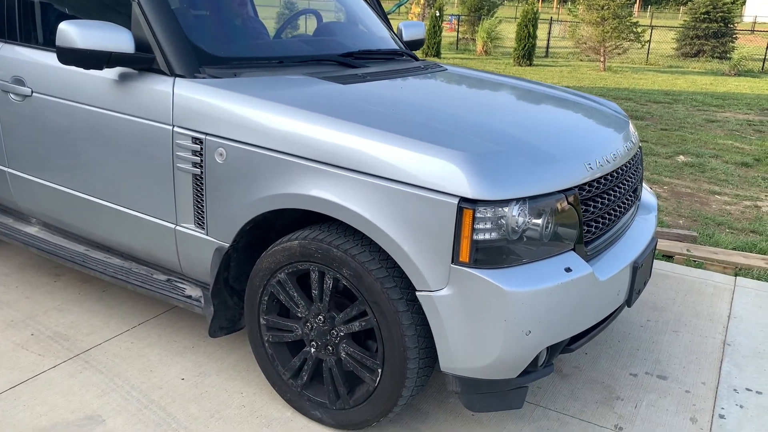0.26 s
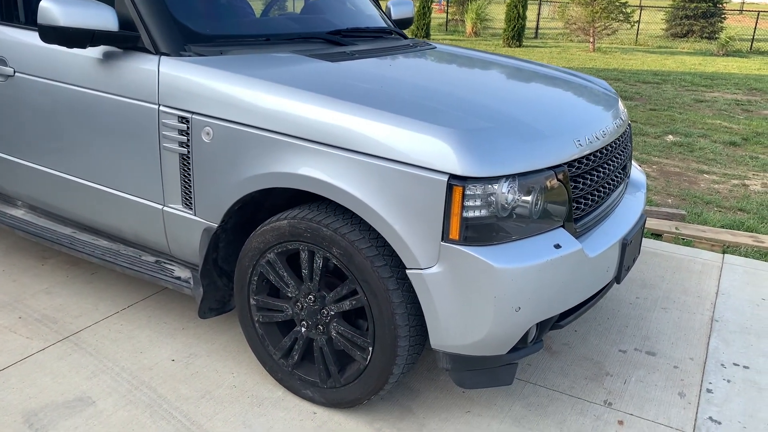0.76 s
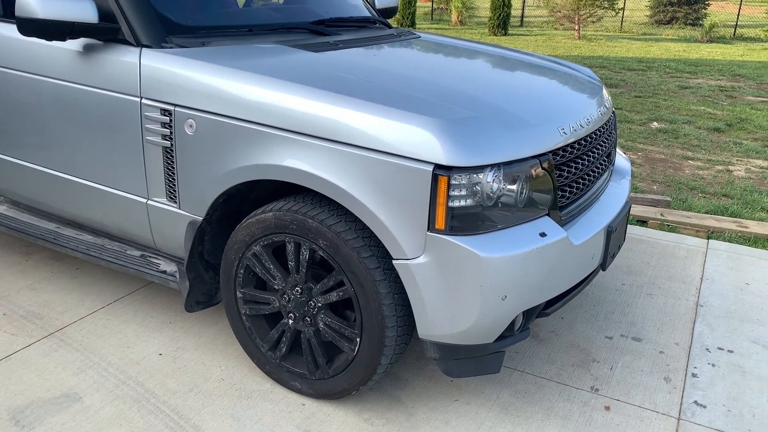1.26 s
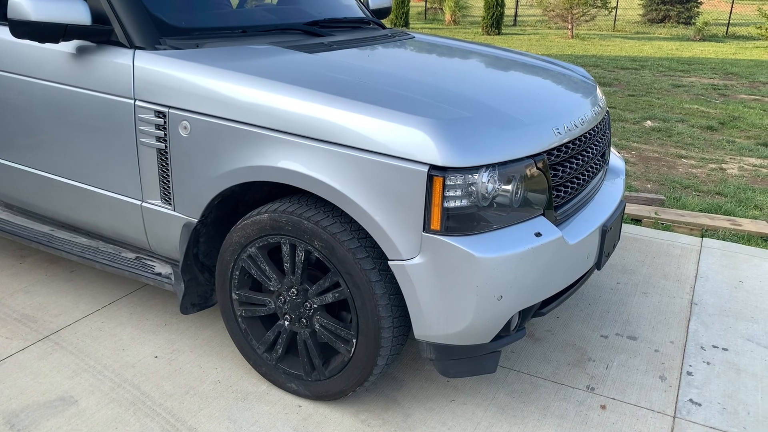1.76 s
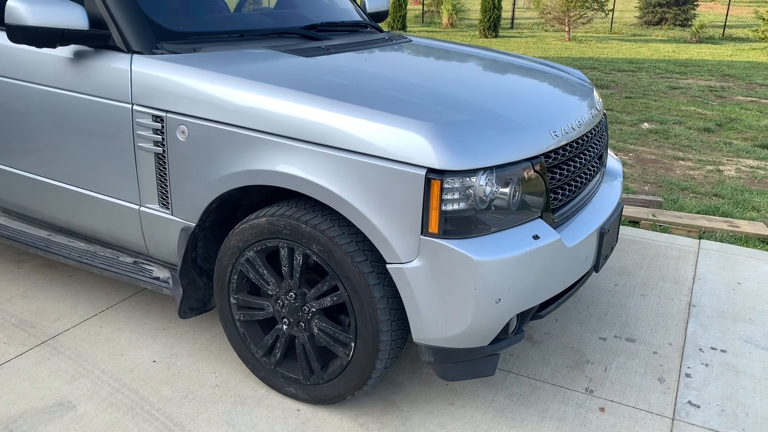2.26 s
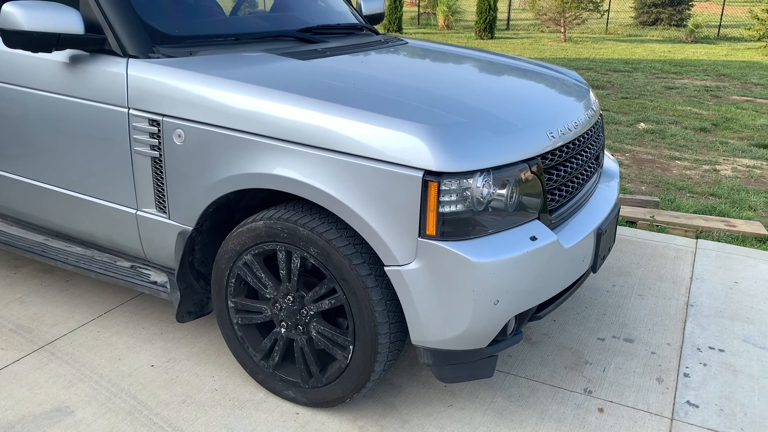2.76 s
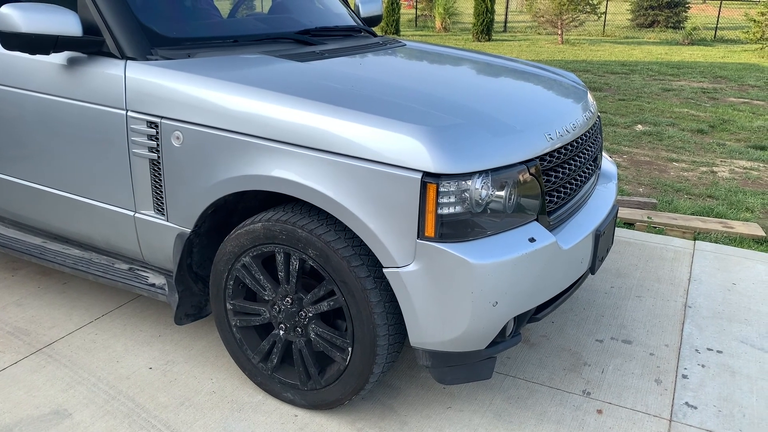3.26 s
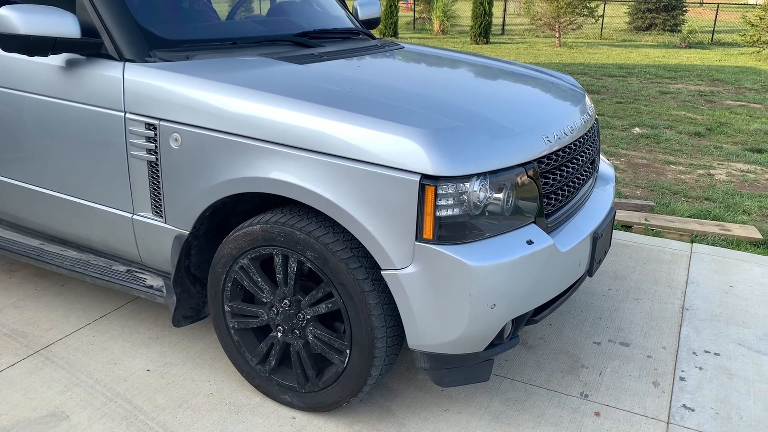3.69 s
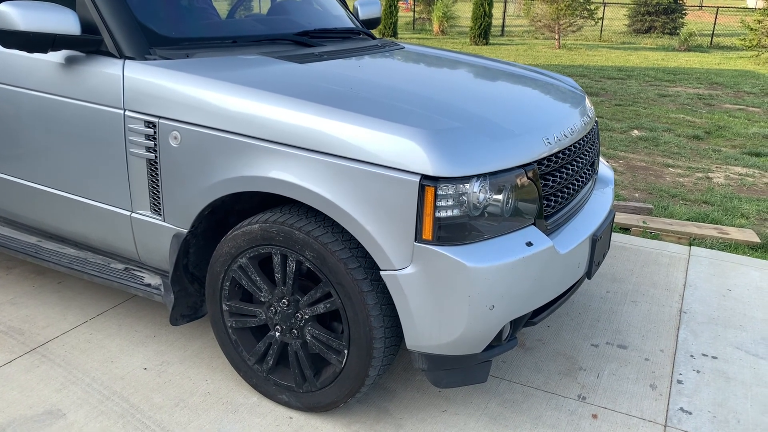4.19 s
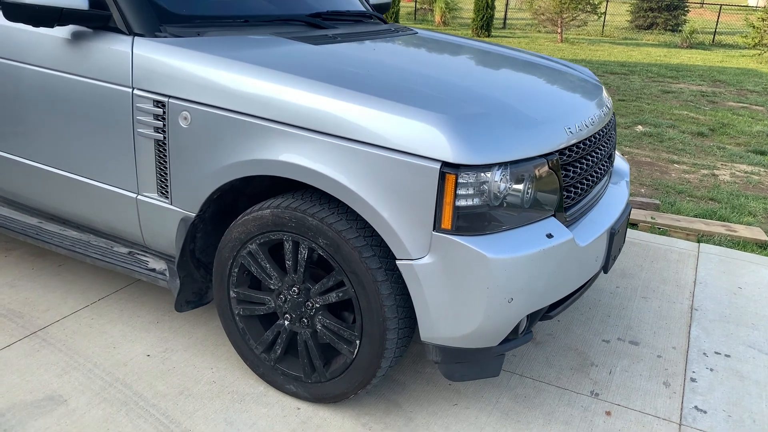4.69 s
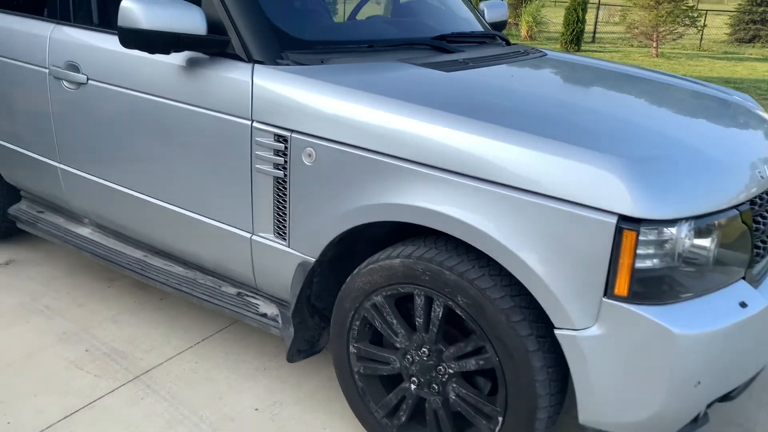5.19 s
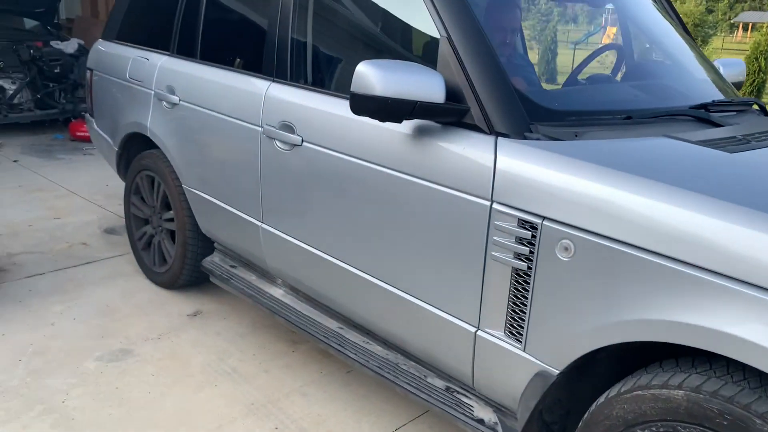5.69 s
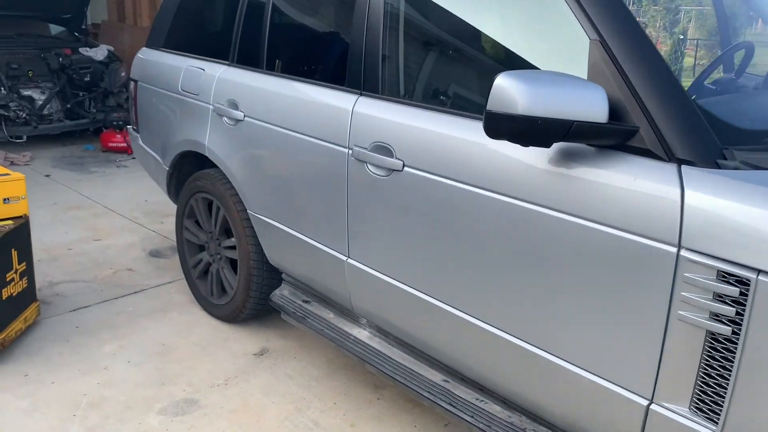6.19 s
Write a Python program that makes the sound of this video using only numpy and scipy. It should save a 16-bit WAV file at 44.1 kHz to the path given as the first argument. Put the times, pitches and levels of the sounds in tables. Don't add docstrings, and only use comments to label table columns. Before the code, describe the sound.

Wind slaps rumble over a big car engine's hissing, tapping idle on a driveway, its tone shifting as the microphone turns near the end.

```python
import sys
import numpy as np
from scipy import signal
from scipy.fft import rfft, irfft, next_fast_len
from scipy.io import wavfile
from scipy.ndimage import uniform_filter1d

SR = 44100
rng = np.random.default_rng(int(sys.argv[2]) if len(sys.argv) > 2 else 0)


def dump(signal):
    limited = np.clip(np.atleast_2d(signal).T, -1, 1)
    pcm = np.round(limited * 32767).astype(np.int16)
    wavfile.write(sys.argv[1], SR, pcm)


def natural_amplitude(level_db):
    exponent = np.asarray(level_db, float) / 20
    return 10 ** exponent


N = 284004
PAD = next_fast_len(N)


def rms_one(x):
    return x / np.sqrt(np.mean(x ** 2) + 1e-20)


def in_time(rows):
    s, *columns = np.transpose(rows)
    return [np.interp(np.arange(N) / SR, s, c) for c in columns]


def at_hz(points, hz):
    table_hz, value = np.array(points).T[:2]
    return np.interp(np.log(hz), np.log(table_hz), value)


def drift(rate_hz):
    r = np.exp(-2 * np.pi * rate_hz * 40 / SR)
    noise = rng.standard_normal(N // 40 + 2002)
    slow = signal.lfilter([1], [1, -2 * r, r * r], noise)[2000:]
    return np.interp(np.arange(N) / 40, np.arange(len(slow)), rms_one(slow))


def afterglow(x, decay_s):
    return signal.lfilter([1], [1, -np.exp(-1 / (decay_s * SR))], x)


def resonate(x, modes):
    out = 0
    for k, (hz, width_hz, level_db) in enumerate(modes):
        r = np.exp(-np.pi * width_hz / SR)
        b = (1 - r * r) / 2 * np.array([1, 0, -1])
        a = [1, -2 * r * np.cos(2 * np.pi * hz / SR), r * r]
        out = out + (-1) ** k * natural_amplitude(level_db) * signal.lfilter(b, a, x)
    return out


def hiss(spectrum, patchy_db):
    hz = np.fft.rfftfreq(PAD, 1 / SR) + 1
    noise = rfft(rng.standard_normal((2, PAD))) * natural_amplitude(at_hz(spectrum, hz))
    low_hz, high_hz = spectrum[0][0], min(spectrum[-1][0], SR / 2)
    out, together = 0, drift(9.3)
    for centre in np.arange(np.log2(low_hz), np.log2(high_hz), .5):
        window = np.cos(np.pi / 2 * np.clip(2 * (np.log2(hz) - centre), -1, 1)) ** 2
        patch = irfft(noise * window, PAD)[:, :N]
        out = out + patch * natural_amplitude(patchy_db * (0.34 * together + drift(31)))
    return rms_one(out)


# (start [s], length [s], level [dB], eddy pitch [octaves above lowest band])
GUSTS = [(0.292, 0.1, -25.5, 0.44), (0.554, 0.046, -27, 0.43), (0.828, 0.094, -19.5, 0.83),
         (0.943, .07, -20, .2), (1.135, 0.053, -14.5, .1), (1.159, .10, -21.5, 2.44), (1.2, 0.086, -22, .1),
         (1.418, 0.18, -26, 0.92), (1.659, 0.015, -17, 1), (2.007, .04, -18, .1),
         (2.079, 0.037, -12.5, 1.06), (2.133, .11, -22.5, 1.94), (2.338, .06, -17, 1.74),
         (2.37, .09, -20, 2.1), (2.383, 0.053, -13, 0.11), (2.55, 0.065, -22.5, 1),
         (2.677, 0.023, -16, 1.8), (2.717, 0.057, -20, 1.98), (2.814, 0.019, -23, 0.12),
         (3.08, .06, -31, 2.1), (3.346, 0.057, -27, 0.14), (4.24, 0.041, -29, .3),
         (4.79, 0.083, -24.5, 1.34), (4.884, 0.11, -27, 0.5), (5.217, 0.052, -29, 0.46),
         (5.426, .05, -27, .1), (.05, 0.12, -27, .1), (5.731, .09, -20, 2.3), (5.908, 0.16, -26.5, 1.73),
         (6.33, .07, -24, 0.082)]
GUST_RISE_S, GUST_FALL_S = 0.012, 0.016
BELOW_DB_PER_OCTAVE, ABOVE_DB_PER_OCTAVE, TOP_DB_PER_OCTAVE_SQUARED = 8, 11.5, 5.0


def gust_power(octaves):
    t, power = np.arange(N) / SR, np.zeros(N)
    for s, length_s, level_db, pitch in GUSTS:
        start_s, hold_end_s = s - GUST_RISE_S, s + length_s
        end_s = hold_end_s + GUST_FALL_S
        span = slice(max(int(start_s * SR), 0), int(end_s * SR))
        shape = np.interp(t[span], [start_s, s, hold_end_s, end_s], [0, 1, 1, 0])
        loss_db = max(BELOW_DB_PER_OCTAVE * (pitch - octaves), ABOVE_DB_PER_OCTAVE * (octaves - pitch))
        loss_db += TOP_DB_PER_OCTAVE_SQUARED * max(octaves - pitch, 0) ** 2
        power[span] += (natural_amplitude(level_db - loss_db) * shape ** 2) ** 2
    return power


# (time [s], level [dB])
BREEZE = [(0, -34.5), (.7, -38.5), (1.4, -37), (1.8, -33), (2.9, -34), (3.6, -37), (4.6, -34), (5.1, -35),
          (5.4, -31), (6.44, -33)]
# (sub-band edges [Hz], ..)
WIND_BANDS_HZ = [
    (42, 58, 76, 100),
    (100, 135, 175, 230),
    (230, 290, 360, 450),
    (470, 580, 740),
]
BREEZE_COLOUR_DB = [1.5, -2, -5.5, -13]
BREEZE_LULL_DB, BREEZE_LULLS_PER_S, BREEZE_CREST = 3.5, 8.4, 0.95


def wind():
    out, lumps, breeze_db = 0, drift(37.0), in_time(BREEZE)[0]
    for colour_db, edges_hz in zip(BREEZE_COLOUR_DB, WIND_BANDS_HZ):
        lull_db = BREEZE_LULL_DB * np.minimum(drift(BREEZE_LULLS_PER_S), BREEZE_CREST)
        breeze = natural_amplitude(breeze_db + colour_db + lull_db)
        layer = blown = 0
        for low_hz, high_hz in zip(edges_hz, edges_hz[1:]):
            sos = signal.butter(3, [low_hz, high_hz], "band", fs=SR, output="sos")
            noise = signal.hilbert(rng.standard_normal(PAD))[:N]
            eddy = signal.sosfilt(sos, noise) / np.sqrt(high_hz)
            eddy = eddy * np.exp(.5j * 1.35 * drift(4.07) * [[1], [-1]])
            layer = layer + eddy
            octaves = np.log2(low_hz / WIND_BANDS_HZ[0][1]) + 0.16
            blown = blown + np.real(eddy) * np.sqrt(breeze ** 2 + gust_power(octaves))
        even = np.sqrt(uniform_filter1d(np.mean(abs(layer) ** 2, axis=0), size=1800))
        out = out + natural_amplitude(2.5 + 1.8 * lumps) * blown / even
    return out


# (time [s], peak level [dB], pitch [Hz])
SLAPS = [(.885, -16, 92), (1.168, -12, 320), (1.662, -24, 124), (2.089, -16, 65.4), (2.1, -19, 109),
         (2.356, -12, 126), (2.399, -11, 62.5), (2.409, -20, 133), (2.681, -13.5, 178), (2.683, -12.5, 560),
         (4.829, -13.5, 138), (4.878, -18.5, 68.4), (4.918, -14.5, 129), (4.973, -19, 211),
         (5.515, -17, 75), (5.248, -16, 105), (5.743, -16, 85), (5.794, -13, 179), (6.061, -14, 220),
         (6.062, -20.5, 420)]
SLAP_LEAD_CYCLES = 0.067


def slaps():
    out, t = np.zeros((2, N)), np.arange(3500) / SR
    for (s, level_db, hz), luck in zip(SLAPS, rng.uniform(-1, 1, (len(SLAPS), 1))):
        shape = t * hz / 0.64 * np.exp(1 - t * hz / .8)
        lead = SLAP_LEAD_CYCLES * (luck + np.sign(luck)) * [[.5], [-.5]]
        wave = np.sin(2 * np.pi * (hz * t * (1 - 2.9 * t) + lead))
        at = round(s * SR)
        out[:, at:at + len(t)] += natural_amplitude(level_db) * shape * wave
    return out


# (frequency [Hz], density [dB per Hz])
RUMBLE = [(18, -31), (30, 3), (64, -3.5), (108, 0), (269, -17), (367, -9), (493, -23.5), (610, -25.5),
          (792, -10.5), (903, -14.5), (1010, -10.5), (1500, -18), (1950, -52), (3300, -120)]


def rumble():
    return natural_amplitude(-33) * hiss(RUMBLE, patchy_db=1.0)


# (frequency [Hz], density [dB per Hz])
AIR = [(3000, -13.5), (4500, -3), (6500, -6), (8300, -2), (9500, -8), (11300, -6), (13400, -4.5),
       (15700, 3)]
AIR_IDLE_DB, AIR_DB_PER_OCTAVE = -40, 6.5
PUFF_S, PUFF_DB, PUFF_DECAY_S = 0.098, 8, 0.013


def air(clicks, octaves):
    since_s = np.arange(N) / SR - PUFF_S
    puff_db = PUFF_DB * np.exp(-np.maximum(since_s, 0) / PUFF_DECAY_S) * (since_s > 0)
    level = natural_amplitude(AIR_IDLE_DB + AIR_DB_PER_OCTAVE * octaves + puff_db)
    pulse = rms_one(afterglow(clicks, 0.006))
    return level * (1 + 0.14 * pulse) * hiss(AIR, patchy_db=1.0)


# (frequency [Hz], width [Hz], level [dB])
INTAKE = [(351, 42, -0.5), (448, 62, 6), (1190, 120, -0.5), (1600, 320, -5.5)]
# (time [s], level [dB])
FLARE = [
    (0, -40.5),
    (.3, -31.5),
    (.7, -36),
    (1.1, -36.5),
    (1.5, -53),
    (6.44, -68),
]


def intake():
    roar = resonate(rng.standard_normal((2, N)), INTAKE)
    return natural_amplitude(in_time(FLARE)[0]) * rms_one(roar)


# (frequency [Hz], density [dB per Hz])
BAY = [(760, -18), (1300, -5.5), (1410, -8.5), (1700, -3), (1830, -3), (2410, -2), (2880, -5), (3670, -4.5),
       (5500, -8.5), (7150, -32), (12100, -120)]
# (frequency [Hz], width [Hz], level [dB])
PANELS = [(1578, 35, -3), (1700, 90, -2), (2127, 50, 1), (2350, 120, -1), (3578, 84, 1), (4133, 70, -2),
          (4520, 120, -4), (5690, 45, -7), (6872, 59, -5), (7600, 150, -8), (8070, 68, -6)]
BAY_IDLE_DB, BAY_DB_PER_OCTAVE = -34.5, 12


def bay(clicks, octaves):
    swell = rms_one(afterglow(clicks, 0.0085))
    base = hiss(BAY, patchy_db=2.0)
    rings = rms_one(resonate(rng.standard_normal((2, N)), PANELS))
    level = natural_amplitude(BAY_IDLE_DB + BAY_DB_PER_OCTAVE * octaves)
    return level * rms_one((base + natural_amplitude(-4) * rings) * (1 + 0.16 * swell))


# (multiple of the cycle [1], level [dB])
ORDERS_DB = [(4, -16), (5, 3), (8, 0), (11, -7), (13, -10), (16, -13), (21, -12), (32, -16)]


def firing(cycle):
    hum = 0
    for k, level_db in ORDERS_DB:
        strength = natural_amplitude(level_db + 1.5 * drift(2.0))
        hum = hum + strength * np.sin(2 * np.pi * k * cycle + .5 * drift(1.0))
    return rms_one(hum)


# (share of cycle [0-1], level settling [dB], level at steady idle [dB])
TAPS = [(.0, -3, 2.5), (0.111, -3, -20), (.23, -3.5, 1.5), (.37, 2.5, -2), (.49, -8.5, -11.5),
        (.62, 2.5, -8), (.77, -13, -12.5), (.88, -2.5, -11.5)]
SETTLED_S = 3.42


def taps(cycle):
    count = int(cycle[-1])
    luck = rng.standard_normal((3, count, len(TAPS)))
    wander = signal.lfilter([.7], [1, -.6], luck[0], axis=0)
    share, early_db, late_db = np.transpose(TAPS)
    when = np.arange(count)[:, None] + share + .0014 * luck[1]
    at = np.searchsorted(cycle, np.clip(when, 0, None))
    level_db = np.where(at < SETTLED_S * SR, early_db, late_db)
    clicks = np.zeros(N)
    clicks[at] = natural_amplitude(level_db + 1.4 * wander + 0.85 * luck[2])
    return clicks


# (frequency [Hz], width [Hz], level [dB])
COVER = [(990, 35, -6), (1030, 38, 0), (1103, 40, -6), (1280, 60, -12)]


def valve_gear(clicks):
    rattle = afterglow(clicks, 0.0077) * rng.standard_normal((2, N))
    drive = rms_one(clicks) + .55 * rms_one(rattle) + .65 * rng.standard_normal((2, N))
    return rms_one(resonate(drive, COVER))


# (frequency [Hz], likeness [0-1])
LIKENESS = [(60, 0.66), (500, 0.8), (700, 0), (1050, 0.9), (1500, 0.51), (2200, 0.64), (3000, 0.35),
            (4200, 0.29), (6000, 0.64), (8200, 0.4), (8900, 0.7), (9500, 1), (10200, 1), (15000, 1)]
# (frequency [Hz], phase [rad])
FACING = [(0, 0), (600, -.9), (1300, .3), (1900, -.8), (3000, 2.2), (4000, .6), (5200, 3.1), (6600, 6.9),
          (7100, 5.3), (8500, 3.14), (10100, 0), (11850, -3.14), (14950, -9.42), (16000, -10.6)]
# (frequency [Hz], phase [rad])
TURNED = [(0, 0), (600, -1.2), (900, -.9), (1900, -3.1), (3000, -3.4), (3600, -6.2), (4400, -6),
          (5600, -9.4), (6300, -11.5), (7400, -13.4), (8500, -15.71), (10100, -18.85), (11850, -21.99),
          (14900, -28.27), (16000, -31.1)]
# (time [s], turn [0 facing - 1 turned])
TURN = [
    (0, 0),
    (4.9, 0.017),
    (5.2, 0.21),
    (5.5, 0.9),
    (5.8, 1),
    (6.44, 0.88),
]
# (delay [s], level [dB])
ECHOES = [(.0031, -27.5), (0.0128, -14.5)]
# (frequency [Hz], level [dB])
FLANK = [(300, -6.5), (800, 2.5), (1050, 2), (1400, 3), (2500, -1), (3900, 0.5), (7000, -1.5), (11000, -2),
         (14000, 3)]
LEAN_FACING_DB, LEAN_TURNED_DB = -1.2, -0.1


def ports(pair):
    hz = np.fft.rfftfreq(PAD, 1 / SR)
    alike = np.clip(at_hz(LIKENESS, hz + 1), 0, 1)
    echoes = 1 + sum(natural_amplitude(level_db) * np.exp(-2j * np.pi * hz * lag_s) for lag_s, level_db in ECHOES)
    shared, private = rfft(pair, PAD) * echoes * np.sqrt([(1 + alike) / 2, (1 - alike) / 2])

    def heard(lead):
        lag = np.exp(-1j * np.interp(hz, *np.transpose(lead)))
        return np.array([shared + private, (shared - private) * lag])

    facing = irfft(heard(FACING), PAD)[:, :N]
    turned = irfft(heard(TURNED) * natural_amplitude(at_hz(FLANK, hz + 1)), PAD)[:, :N]
    turn = np.clip(in_time(TURN)[0], 0, 1)
    lean_db = LEAN_FACING_DB + (LEAN_TURNED_DB - LEAN_FACING_DB) * turn
    bend = np.array([[1], [.7]])
    both = facing * (1 - turn) ** bend + turned * turn ** bend
    return both * natural_amplitude(lean_db * np.array([[.5], [-.5]]))


# (time [s], four-stroke cycles [1/s])
SPEED = [(0, 14.1), (.8, 13.8), (1.2, 13.1), (1.55, 12.2), (2.35, 11.84), (2.75, 11.35), (3.15, 11.17),
         (4.35, 11.42), (4.75, 11.15), (5.15, 11.18), (6.44, 11.4)]
# (time [s], valve tapping [dB], firing hum [dB])
ENGINE = [(0, -51, -39), (.4, -40, -41), (.95, -43, -61), (1.15, -33.5, -57), (1.9, -38, -44),
          (2.35, -31.5, -41), (2.9, -37.5, -42), (3.4, -34.5, -40), (3.9, -35, -29), (4.5, -34, -31.5),
          (5.15, -31, -35.5), (5.45, -36.5, -36.5), (6.44, -40, -48)]
IDLE_CYCLES_PER_S = 11.3


def scene():
    speed = in_time(SPEED)[0]
    cycle, octaves = np.cumsum(speed) / SR, np.log2(speed / IDLE_CYCLES_PER_S)
    tap_db, hum_db = in_time(ENGINE)
    clicks = taps(cycle)
    engine = rumble() + air(clicks, octaves) + intake() + bay(clicks, octaves)
    engine += natural_amplitude(tap_db) * valve_gear(clicks)
    return wind() + slaps() + natural_amplitude(hum_db) * firing(cycle) + ports(engine)


DUCK_FROM_DB, DUCK_SHARE, DUCK_RELEASE_DB_PER_S, DUCK_ATTACK_S = -20.5, 0.17, 14, 0.011


def ducked(x):
    power = uniform_filter1d(np.mean(x ** 2, axis=0), size=1300)
    level_db = 10 * np.log10(np.maximum(power, 1e-9))
    ramp_db = DUCK_RELEASE_DB_PER_S * np.arange(N) / SR
    held_db = np.maximum.accumulate(level_db + ramp_db) - ramp_db
    over_db = np.maximum(held_db - DUCK_FROM_DB, 0)
    r = np.exp(-1 / (DUCK_ATTACK_S * SR))
    return x * natural_amplitude(-DUCK_SHARE * signal.lfilter([1 - r], [1, -r], over_db))


def low_pass(x):
    return signal.sosfilt(signal.butter(12, 15680, fs=SR, output="sos"), x)


def record(dry):
    cut = signal.sosfilt(signal.butter(2, 38, "high", fs=SR, output="sos"), dry)
    return low_pass(0.77 * np.tanh(ducked(cut) / 0.84))


dry = scene()
out = record(dry)
dump(out)
```